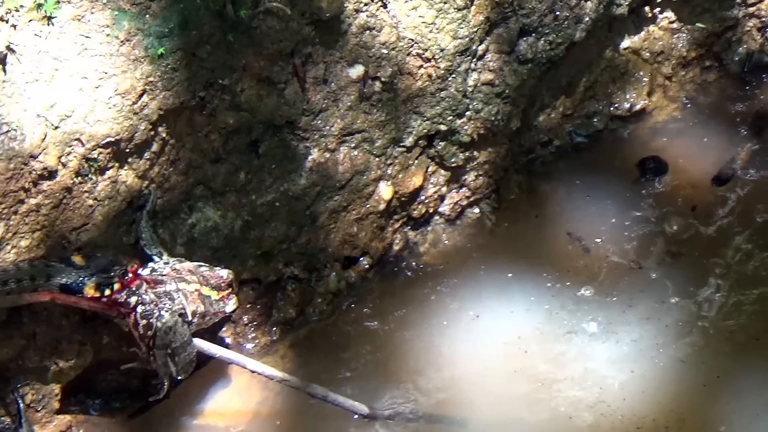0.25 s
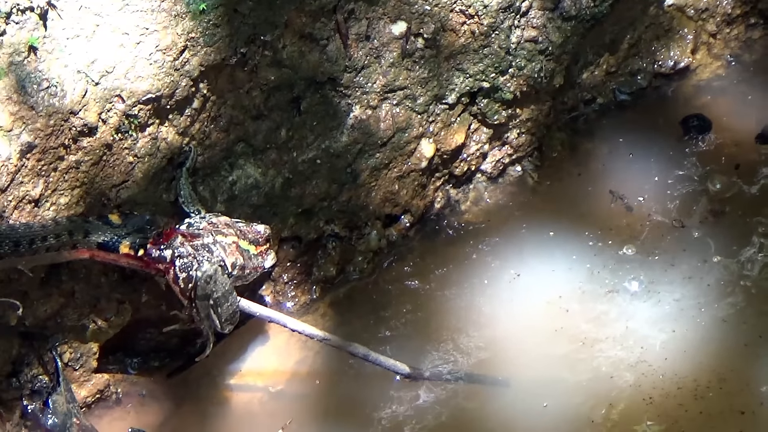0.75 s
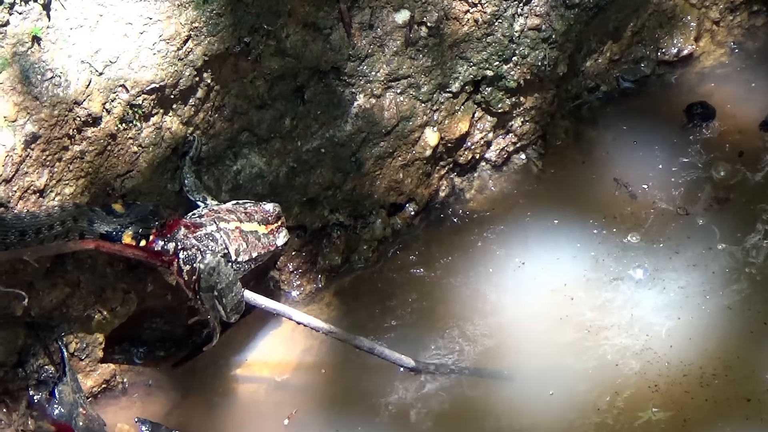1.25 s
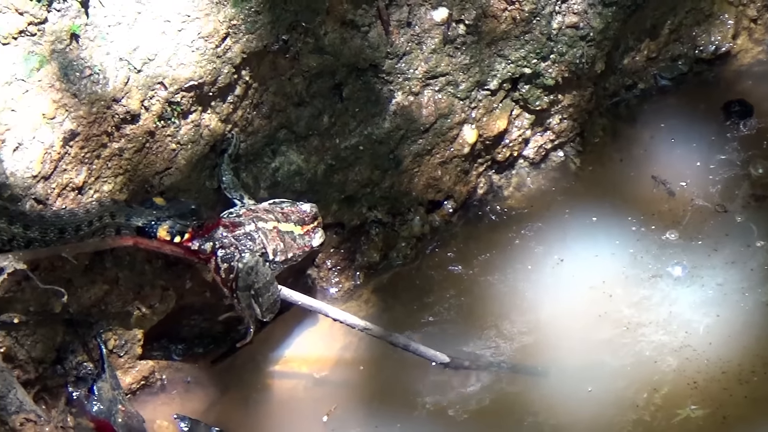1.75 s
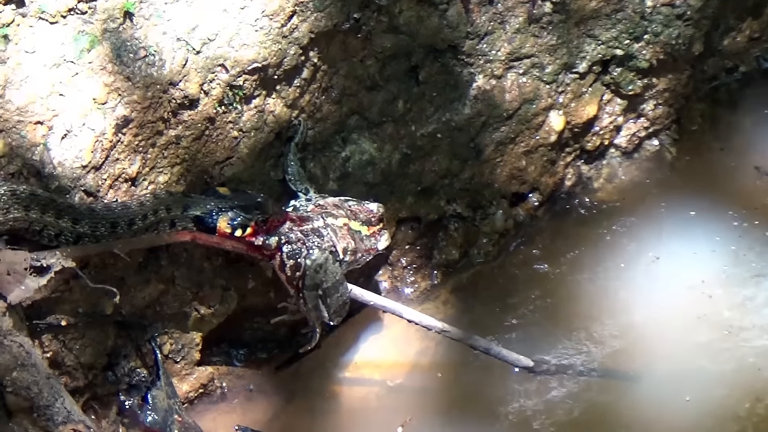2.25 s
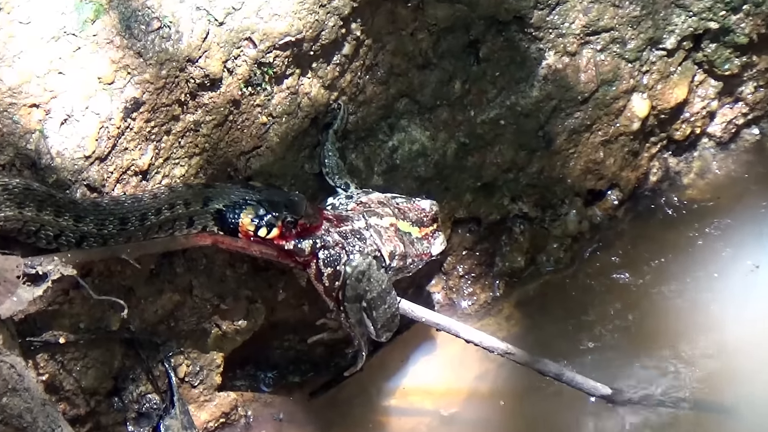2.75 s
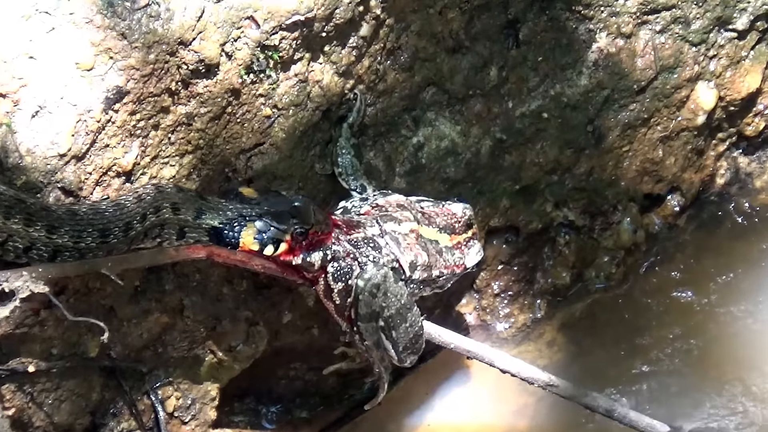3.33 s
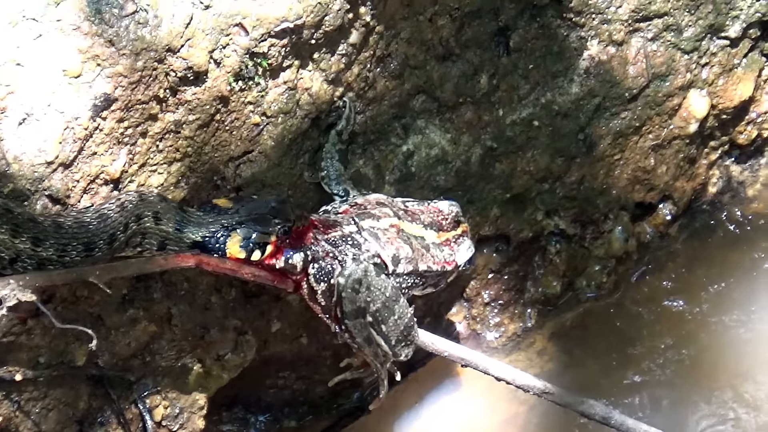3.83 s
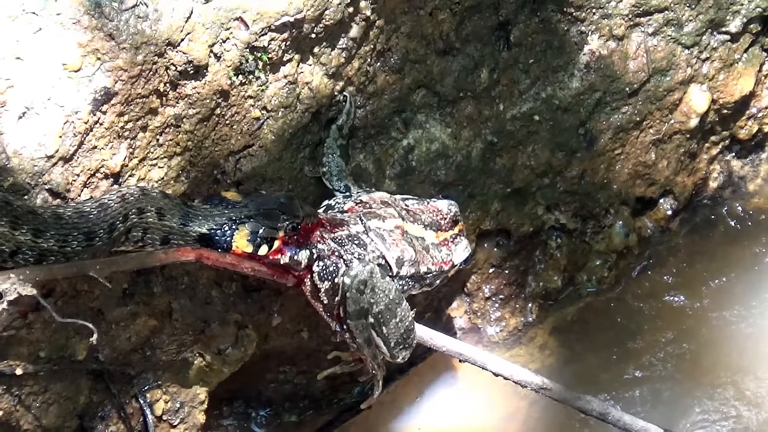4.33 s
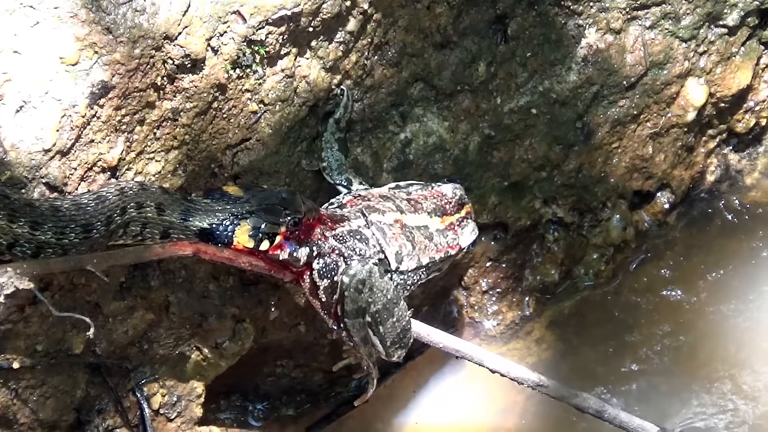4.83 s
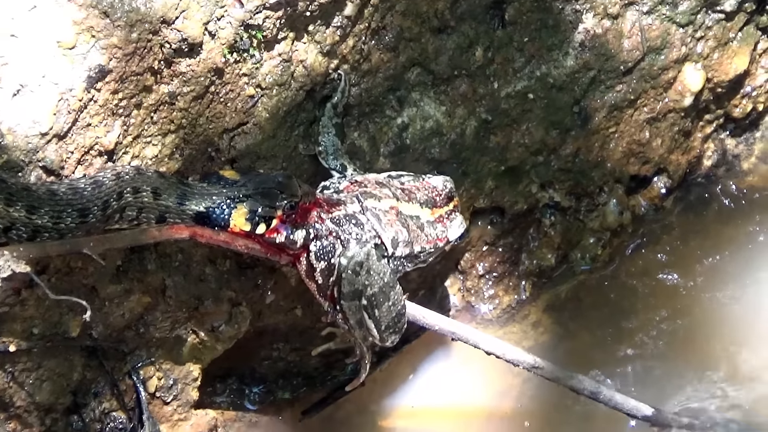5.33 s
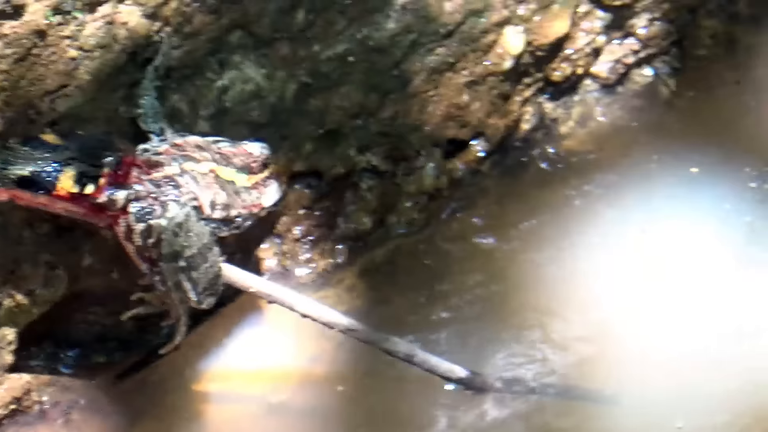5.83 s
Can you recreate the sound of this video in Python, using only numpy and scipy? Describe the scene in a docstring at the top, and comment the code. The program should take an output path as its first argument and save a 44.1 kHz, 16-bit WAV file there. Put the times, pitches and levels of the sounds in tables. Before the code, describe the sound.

A frog held by a snake at the edge of a forest pool gives two creaking distress calls about three seconds apart. Each speeds up, slows to a rattle and ends in a dull flutter. A few brief dry rustles come between the calls, and small wet mud clicks cluster near the end. The sounds are close, over a faint forest hush and a low hum and rumble at the microphone.

```python
"""First come a faint forest hush, and a low hum and rumble at the microphone that swells and sinks.
Close by, on the bank of a pool, wet mud parts with small clicks, among short dry rustles.
Just left of centre, a frog held by a snake gives two creaking distress calls, each led by a soft grunt.
A call is a train of sharp slaps of the vocal folds that speeds up, slows to a rattle,
spurts once more and ends in a dull flutter as the throat slackens."""
import sys
import numpy as np
from scipy import signal
from scipy.fft import rfft, irfft
from scipy.io import wavfile
from scipy.ndimage import uniform_filter1d

SR = 44100
rng = np.random.default_rng(int(sys.argv[2]) if len(sys.argv) > 2 else 0)


def put_to_file(sound):
    """Save the sound as 16-bit audio at rate SR, in the file named by the first command-line argument."""
    columns = np.atleast_2d(sound).T  # one column per channel
    safe = np.clip(columns, -1, 1)
    whole_steps = np.round(safe * 32767)
    wavfile.write(sys.argv[1], SR, whole_steps.astype(np.int16))


N = 268304
TIME = np.arange(N) / SR


# spectrum of the forest hush all around: f/Hz, relative level/dB
HUSH_COLOUR = [(20, -61), (45, -12.5), (100, -10), (135, -11.5), (240, -6.5), (330, 4), (470, -2.5),
               (900, -1), (1500, -6.5), (3200, -9), (6000, -16), (9000, -14), (12000, -24), (16000, -28)]
# spectrum of the hum and rumble at the microphone: f/Hz, relative level/dB
RUMBLE_COLOUR = [(20, -34), (100, -28.5), (135, -4.5), (190, -1.5), (235, -7), (330, -7), (480, -41),
                 (900, -38)]
# swells of the rumble: t/s, level/dB
RUMBLE_LEVEL = [(0.0, -61), (0.24, -58), (0.46, -67.5), (0.96, -64), (1.35, -57), (1.59, -65.5),
                (1.76, -57), (2.47, -56), (3.12, -65), (4.38, -60.5), (5.79, -63.5), (6.08, -68)]

def hush_and_rumble(hush_db=-57, fade_db_per_s=0.4055):
    """A wide forest hush slowly fades; at the microphone, a low hum and rumble swells and sinks."""
    hush = from_db(hush_db - fade_db_per_s * TIME) * stereo_noise(HUSH_COLOUR, side_db=-6.5)
    rumble = from_db(curve(RUMBLE_LEVEL, TIME)) * stereo_noise(RUMBLE_COLOUR, side_db=-40)
    return hush + rumble


def faint_clicks(per_s=3, db=-64, spread_db=1):
    """Extra rows of mud clicks at random times, dull and barely over the hush."""
    draws = rng.random((40, 4))
    times = np.cumsum(-np.log(1 - draws[:, 0])) / per_s
    return [(s, db + spread_db * (2 * size - 1), -6 * dull, 800 * 2 ** (2 * pitch), 6)
            for s, (_, size, dull, pitch) in zip(times, draws) if s < N / SR]


# clicks in the mud: t/s, base level/dB, brightness/dB, air pocket f/Hz, pocket level re base/dB
MUD_CLICKS = [(0.513, -55, 5, 1070, 5), (0.962, -62, -5, 1250, 13), (1.993, -53.5, -6, 740, 5),
              (3.341, -42, -4.5, 1600, 8.5), (3.489, -63, 0, 3340, 21), (4.296, -61, -9, 955, 16),
              (5.445, -47, 3.5, 2780, 7), (5.471, -36.5, 0.5, 1870, 6.5), (5.508, -44, -6.5, 920, 8),
              (5.522, -44, 1.5, 1280, 12.5), (5.548, -58, -7, 1060, 16), (5.74, -50, -3, 2990, 14),
              (5.772, -32.5, 6, 3340, 13.5), (5.805, -48, -6, 1220, 4.5), (5.8649, -49, 4, 3500, 4),
              (5.87, -28, 0, 897, 9.5), (5.871, -41, -5, 572, 12), (5.884, -32.5, 0, 1780, 11.5),
              (5.949, -32.5, 3, 1320, 3.5), (5.987, -41.5, 5.5, 3380, 11), (6.0141, -40, 8.5, 3400, 2),
              (6.02, -35, 11.5, 3340, 3), (6.026, -38, 8, 1140, 1), (6.051, -46, -2.5, 1930, 7)]

def wet_clicks(crack_s=0.001373, pocket_s=0.001816, pocket_cycles=17):
    """Close by, a film of wet mud snaps, crackles longest in the lows and frees a ringing air pocket."""
    out, t = np.zeros(N), TIME[:SR // 20]
    for s, db, bright_db, pocket_hz, pocket_db in MUD_CLICKS + faint_clicks():
        snap = from_db(db + 3.5 + .5 * bright_db) * np.array([1, -1])
        add(out, s + crack_s, snap)
        for band_hz, band_db, t60 in (((800, 1700), -16 - bright_db, 0.031),
                                      ((1600, 4800), -13, 0.015),
                                      ((6000, 10500), -17 + bright_db, 0.0024)):
            crackle = rng.standard_normal(len(t)) * from_db(-60 * t / t60)
            crackle[0] += 4.4   # the opening crack
            crackle = rms_one(butter(crackle, band_hz, "band", order=2))
            add(out, s + crack_s, from_db(db + band_db) * crackle)
        cycles = pocket_hz * t
        pocket = from_db(db + pocket_db - 60 * cycles / pocket_cycles) * np.sin(2 * np.pi * cycles)
        add(out, s + pocket_s, pocket)
    return butter(out, (410, 13500), "band", order=3)


# spectra of a rustle's hiss and of its scrape: f/Hz, relative level/dB
HISS_COLOUR = [(600, -32), (3300, -27), (5500, -8.5), (7200, 4.5), (8700, 9), (10500, 1.5), (12500, -9.5),
               (16000, -13)]
SCRAPE_COLOUR = [(300, -9), (700, -9), (1500, 2), (3300, -5.5), (4400, 4), (5500, -12), (8000, -24)]
# dry rustles: t/s, level/dB, length/s, scrape level re hiss/dB
RUSTLES = [(0.55, -59, 0.037, -6), (2.3395, -37.5, 0.024, -16.5), (2.517, -47, 0.0023, -20),
           (2.528, -40.5, 0.0026, -13), (2.654, -46, 0.03, -9.5), (2.915, -55, 0.027, -11),
           (2.935, -50.5, 0.026, -5), (3.814, -60.5, 0.022, -18)]

def rustles(rise_s=0.00089, grain_db=4.5):
    """Near the microphone, bright scuffs over a lower scrape: a quick start, a grainy hold, a fade."""
    hiss, scrape = np.zeros((2, N))
    t = TIME[:SR // 10]
    for s, db, length, scrape_db in RUSTLES:
        envelope = from_db(db) * (1 - np.exp(-t / rise_s)) * np.exp(-(t / length) ** 2.6)
        add(hiss, s, envelope)
        add(scrape, s, from_db(scrape_db) * envelope)
    noise = rng.standard_normal(N)
    flicker = rms_one(uniform_filter1d(rng.standard_normal(N), size=20))
    grains = noise * from_db(grain_db * flicker)
    return hiss * rms_one(colour(grains, HISS_COLOUR)) + scrape * rms_one(colour(grains, SCRAPE_COLOUR))


# a grunt before each call: start t/s, end t/s, pulse rate/Hz, level/dB, throat f/Hz
GRUNTS = [(1.117, 1.13, 180, -15, 2010), (4.526, 4.547, 140, -12, 1900)]

def grunts():
    """A few soft, dull slaps of the frog's vocal folds."""
    out = np.zeros(N)
    for start, end, rate_hz, db, throat_hz in GRUNTS:
        body, _ = fold_slap(throat_hz, ring_db=-6, overtone_db=-19)
        for s in np.arange(start + .5 / rate_hz, end, 1 / rate_hz):
            add(out, s, from_db(db) * body)
    return out


def fold_slap(throat_hz, ring_db, overtone_db=-9, rasp_hz=9230):
    """One slap as (body, treble): tension sets a ringing upper edge and overtones that sink with it."""
    slap = signal.unit_impulse(SR // 100)
    ringing = slap + from_db(ring_db) * resonance(slap, throat_hz, width_hz=1180)
    body = butter(ringing, .97 * throat_hz, "low", order=10)
    overtone_hz = 1210 + 0.818 * throat_hz
    overtone = butter(resonance(slap, overtone_hz, 1730), 1.25 * overtone_hz, "low", order=6)
    rasp = resonance(slap, rasp_hz, 115) + .5 * resonance(slap, 10030, 2400)
    rasp = resonance(rasp, rasp_hz, 2600)
    top_hz = 10900 + 0.28 * throat_hz
    top = resonance(resonance(slap, top_hz, 720), top_hz, 2300)
    tension = throat_hz / 6000   # only taut folds make the treble rasp
    treble = from_db(-18) * tension ** 2.6 * rasp + from_db(-23.5) * tension ** 1.5 * top
    return body - from_db(overtone_db) * overtone, treble


# how fast the folds slap in each call: t/s, pulse rate/Hz
FIRST_CALL_RATE = [(1.138, 81.3), (1.172, 141.3), (1.264, 244.7), (1.314, 126.2), (1.405, 71.8),
                   (1.487, 50.2), (1.615, 43.7), (1.68, 68.9), (1.715, 169.0), (1.8, 24.7)]
SECOND_CALL_RATE = [(4.592, 62.3), (4.687, 192.1), (4.789, 108.6), (4.878, 71.6), (5.01, 55.3),
                    (5.063, 100.8), (5.089, 162.6), (5.19, 30.2)]
# the calls: start t/s, attack/s, slack t/s, level/dB, opening f/Hz, top f/Hz, ring fade/(dB/s)
CALLS = [(1.142, 0.11, 1.679, -2.5, 4320, 6400, 35), (4.593, .081, 5.065, -1, 5470, 5925, 115)]

def frog(shimmer_db=.5, rasp_db_per_octave=2.4, neutral_rate_hz=73):
    """On the bank, the folds slap once a cycle, raspier when fast; the mouth colours each slap's body."""
    bodies, trebles = np.zeros((2, N))
    for rate, call in zip((FIRST_CALL_RATE, SECOND_CALL_RATE), CALLS):
        cycles = np.cumsum(curve(rate, TIME, left=0, right=0)) / SR
        for s in TIME[1:][np.diff(np.round(cycles)) > 0]:
            db, throat_hz, ring_db = throat(call, s)
            strength = from_db(db + shimmer_db * rng.standard_normal())
            body, treble = fold_slap(throat_hz, ring_db)
            rasp_db = rasp_db_per_octave * np.log2(curve(rate, s) / neutral_rate_hz)
            add(bodies, s, strength * body)
            add(trebles, s, strength * from_db(rasp_db) * treble)
    return mouth(grunts() + bodies) + trebles


def throat(call, s, tighten_s=.031, hold_s=0.11, sag_hz_per_s=5400, collapse_s=.075, rest_hz=280):
    """The throat tightens, holds, sags and goes slack; gives level/dB, f/Hz and ring/dB at time s."""
    start, attack_s, slack_at, db, open_hz, top_hz, ring_fade = call
    age, slack_for = max(s - start, 0), s - slack_at
    sag_for = max(min(s, slack_at) - start - attack_s - hold_s, 0)
    taut_hz = top_hz + (open_hz - top_hz) * np.exp(-age / tighten_s) - sag_hz_per_s * sag_for
    throat_hz = rest_hz + (taut_hz - rest_hz) * np.exp(-max(slack_for, 0) / collapse_s)
    attack_db = -8.5 * max(1 - age / attack_s, 0)
    gush_db = 5.5 * np.exp(-((slack_for - 0.029) / .03) ** 2)   # slack folds let a last gush through
    release_db = -135 * max(slack_for - 0.076, 0)   # then the call dies
    ring_db = max(12 - ring_fade * max(age - attack_s, 0), -23)
    return db + attack_db + gush_db + release_db, throat_hz, ring_db


# resonances of the frog's open mouth: f/Hz, width/Hz, level/dB
MOUTH_RESONANCES = [(1133, 65, -7), (1348, 140, -6), (1753, 345, -3.5), (2560, 1170, -14),
                    (3210, 120, -12.5), (4350, 500, -9.5), (5140, 1460, -4.4), (6300, 3000, -7.5)]

def mouth(x, low_cut_hz=930):
    """The resonances ring side by side; so small a mouth radiates no bass."""
    ringing = sum(from_db(db) * resonance(x, hz, width) for hz, width, db in MOUTH_RESONANCES)
    return butter(ringing, low_cut_hz, "high", order=5)


# echoes from close around the microphone: delay/ms, gain
CLOSE_ECHOES = [(.95, .14), (1.34, -.28), (2.15, -.16), (2.54, .14), (3.08, .07), (3.58, .09), (4.46, .08),
                (5.83, .07)]

def bank(x, scatter_db, scatter_t60, side_db, trees_db=-23, trees_t60=0.16):
    """Close echoes, a quick scatter off the rough bank and a faint tail from the trees beyond."""
    out = x + sum(gain * np.interp(TIME - ms / 1000, TIME, x) for ms, gain in CLOSE_ECHOES)
    t = TIME[:SR // 2]
    for db, t60 in ((scatter_db, scatter_t60), (trees_db, trees_t60)):
        mid, side = rng.standard_normal((2, len(t))) * from_db(-60 * t / t60) * (t > .002)
        tail = rms_one(mid + from_db(side_db) * side * [[1], [-1]]) / np.sqrt(len(t))
        out = out + from_db(db) * signal.fftconvolve(x[None], tail)[:, :N]
    return out


def from_db(db):
    return 10 ** (np.asarray(db) / 20)


def rms_one(x):
    return x / np.sqrt(np.mean(x ** 2) + 1e-20)


def curve(rows, t, **ends):
    """A two-column table, read at times t."""
    return np.interp(t, *np.transpose(rows), **ends)


def add(track, s, sound):
    """Mix a short sound into a track at time s."""
    at = round(s * SR)
    track[at:at + len(sound)] += sound[:max(N - at, 0)]


def butter(x, hz, kind, order):
    sections = signal.butter(order, np.clip(hz, 10, .45 * SR), kind, fs=SR, output="sos")
    return signal.sosfilt(sections, x)


def colour(x, spectrum, size=4096):
    """Causal (minimum-phase) filter that follows a table of f/Hz, level/dB."""
    hz, db = np.transpose(spectrum)
    bin_hz = np.maximum(np.arange(size // 2 + 1) * SR / size, 1)
    gain = from_db(np.interp(np.log(bin_hz), np.log(hz), db))
    cepstrum = irfft(np.log(gain))
    cepstrum[1:size // 2] *= 2
    cepstrum[size // 2 + 1:] = 0
    impulse_response = irfft(np.exp(rfft(cepstrum)))
    return signal.fftconvolve(x, impulse_response)[:len(x)]


def resonance(x, hz, width_hz):
    """One ringing band, with unit gain at its peak."""
    r = np.exp(-np.pi * width_hz / SR)
    feedback = [1, -2 * r * np.cos(2 * np.pi * hz / SR), r * r]
    return signal.lfilter(np.array([1, 0, -1]) * (1 - r * r) / 2, feedback, x)


def stereo_noise(spectrum, side_db, apart_hz=700):
    """Coloured noise, common to both sides in the bass and wider above; rms 1."""
    mid, side = (rms_one(colour(white, spectrum)) for white in rng.standard_normal((2, N)))
    return rms_one(mid + from_db(side_db) * butter(side, apart_hz, "high", order=1) * [[1], [-1]])


def scene():
    """From the microphone, the frog sits just left of centre; the small sounds spread a little wider."""
    background = hush_and_rumble()
    small_sounds = bank(wet_clicks() + rustles(), scatter_db=-8, scatter_t60=0.019, side_db=1.5)
    calls = bank(frog(), scatter_db=-11.5, scatter_t60=0.088, side_db=-6)
    pan_db = [[.45], [-.45]]
    return background + small_sounds + calls * from_db(pan_db)


def record(dry, cutoff_hz=16100):
    """The top is cut steeply."""
    return signal.sosfiltfilt(signal.ellip(10, .1, 70, cutoff_hz, fs=SR, output="sos"), dry)


dry = scene()
out = record(dry)
put_to_file(out)
```